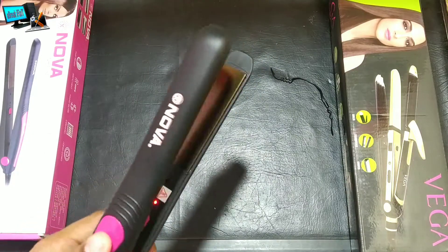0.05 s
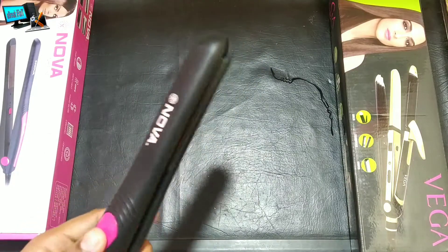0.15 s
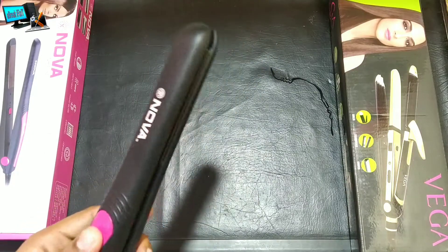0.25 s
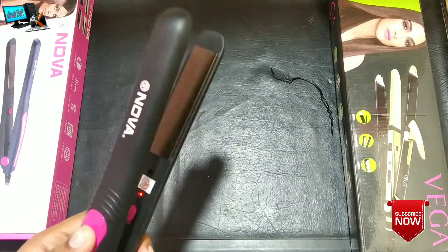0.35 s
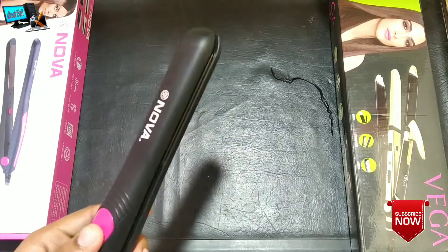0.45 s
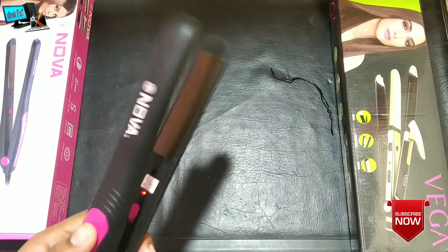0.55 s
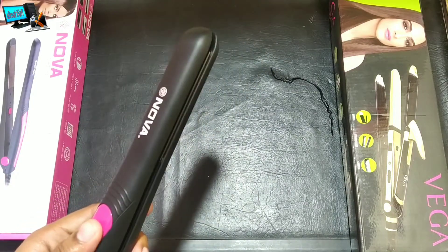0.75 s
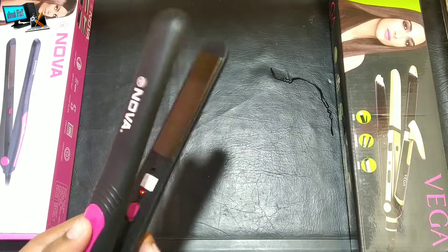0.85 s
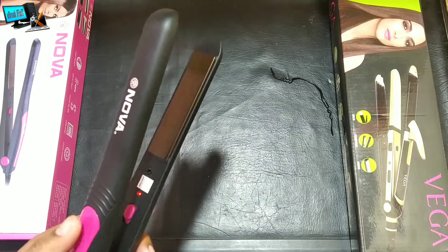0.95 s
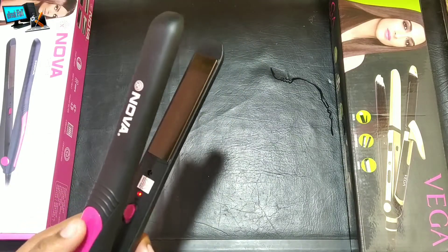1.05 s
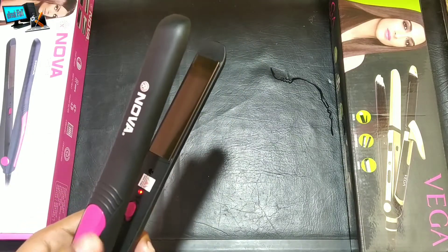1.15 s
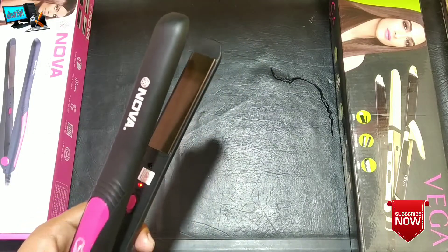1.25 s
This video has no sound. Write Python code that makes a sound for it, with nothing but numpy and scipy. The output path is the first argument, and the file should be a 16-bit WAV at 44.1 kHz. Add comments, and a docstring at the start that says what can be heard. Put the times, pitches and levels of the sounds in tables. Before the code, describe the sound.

A hair straightener snaps shut three times with bright, ringing clacks in a quiet room.

```python
"""Three bright, ringing clacks over a low rumble: a hair straightener snapped shut close to the microphone.
The plastic arms brush, then the metal plates meet and ring, overloading the microphone.
Nearby surfaces throw each clack back and the quiet, bare room rings on.
The hand rubs softly on the handle between the first two clacks."""
import sys
import numpy as np
from scipy import signal
from scipy.fft import rfft, irfft
from scipy.io import wavfile
from scipy.ndimage import uniform_filter1d

SR = 44100
rng = np.random.default_rng(int(sys.argv[2]) if len(sys.argv) > 2 else 0)


def dump_mix(stems):
    """Bounce the given channels to the path in sys.argv[1] as a 16-bit WAV at rate SR."""
    frames = np.atleast_2d(stems).T  # one column per channel
    limited = np.clip(frames, -1, 1)  # hard clip at full scale
    pcm = np.round(limited * 32767).astype(np.int16)
    wavfile.write(sys.argv[1], SR, pcm)


N = 57330
T, HZ = np.arange(N) / SR, np.fft.rfftfreq(N, 1 / SR)


def amp(db):
    """Decibels to gain."""
    return 10 ** (np.asarray(db) / 20)


def unit_rms(x):
    """Scales to an rms of one."""
    return x / np.sqrt(np.mean(x ** 2) + 1e-20)


def curve(points, hz=HZ):
    """Interpolates a table over log frequency."""
    freq_hz, value = np.transpose(points)
    return np.interp(np.log(hz + 1), np.log(freq_hz), value)


def hump(hz, width_hz):
    """Bell-shaped resonance, peak of one."""
    return np.exp(-((HZ - hz) / width_hz) ** 2)


def fade(t60_s):
    """Exponential decay."""
    return np.exp(-np.log(1000) * T / t60_s)


def add(mix, start_s, sound):
    """Mixes a sound in at start_s."""
    part = mix[:, round(start_s * SR):]
    part += sound[:, :part.shape[1]]


def noise(gain):
    """Coloured noise at the two microphone ports."""
    # left-right likeness: freq_hz, correlation
    likeness = [(40, 0.89), (90, 1), (250, 0.83), (700, 0.22), (1400, -0.16), (2800, 0.032), (6000, -0.088),
                (15000, 0.3)]
    correlation = curve(likeness)
    left, independent = rfft(rng.standard_normal((2, N)))
    right = correlation * left + np.sqrt(1 - correlation ** 2) * independent
    return irfft(np.array([left, right]) * gain, N)


def ringing(gain, decay_table):
    """Dense overlapping modes, each band dying at its own rate."""
    hz, time_s, bands = signal.stft(noise(gain), SR, nperseg=256)
    decay = amp(-60 * time_s / curve(decay_table, hz)[:, None])
    return signal.istft(bands * decay, SR, nperseg=256)[1][:, :N]


def background():
    """Low rumble, faint hiss and steady hum."""
    # noise floor spectrum: freq_hz, density_db
    floor = [(20, -26), (55, 3.5), (90, -8), (140, 0), (200, -20), (400, -16.5), (800, -22.5), (2000, -28),
             (6000, -33.5), (15000, -36)]
    # hum tones: pitch_hz, rms_db
    tones = [(59.2, -61), (91, -53), (118.4, -63.5), (250, -64.5)]
    hum = sum(amp(db) * np.sqrt(2) * np.sin(2 * np.pi * (hz * T + rng.random())) for hz, db in tones)
    return amp(-49) * unit_rms(noise(amp(curve(floor)))) + hum


def clack_spectrum(thud_db, hollow_db, ring_db, ring_hz):
    """Stereo gain per frequency of one blow; each favours different modes."""
    # base spectrum: freq_hz, density_db
    base = [(60, -12), (200, -23.5), (450, -12.5), (750, -10.5), (1500, -1), (2600, -1), (5400, -2),
            (8000, 0.5), (11500, -1), (15500, -2)]
    # plastic arm resonances: centre_hz, width_hz, gain_db
    arms = [(631, 74, 8.5), (1054, 193, 7), (1447, 70, -5.5), (2710, 150, 2.5), (3400, 47, 2),
            (4240, 180, 4.5), (6050, 200, -1), (6640, 260, 4)]
    # stereo balance: freq_hz, left_minus_right_db
    balance = [(200, 2.5), (700, -0.5), (1500, -1), (5000, -1), (10000, 2)]
    span = round(90 / HZ[1])  # 90 Hz in bins
    ripple = uniform_filter1d(uniform_filter1d(rng.standard_normal(len(HZ)), span), span)
    body_db = curve(base) + sum(db * hump(hz, width) for hz, width, db in arms) + 2.3 * unit_rms(ripple)
    blow_db = thud_db * hump(0, 600) + hollow_db * hump(1140, 300) + ring_db * hump(ring_hz, 1240)
    pan_db = curve(balance) * np.array([[.5], [-.5]])
    return amp(body_db + blow_db + pan_db)


def brush(gain, meet_s, rise_s=.0013):
    """The arms touch just before the plates meet."""
    return amp(-17) * noise(gain) * np.exp(-abs(T - meet_s) / rise_s) * (T < meet_s)


def snap(gain):
    """Short noise burst as the plates meet."""
    # snap colour: freq_hz, gain_db
    colour = [(200, -9), (700, -0.5), (3000, -3), (9500, 1.5), (15000, 0.5)]
    return amp(-1.5) * noise(gain * amp(curve(colour))) * fade(t60_s=.035)


def knock(gain_db, pitch_hz):
    """One fast-dying tone of the impact."""
    return amp(gain_db - 11) * np.sin(2 * np.pi * pitch_hz * T)[None] * fade(t60_s=.04)


def plate_ring(scatter_db=2.5):
    """The metal plates ring, each mode with its own phase at each port."""
    # clearest plate modes: pitch_hz, level_db
    modes = [(2790, -7), (4313, -6), (6617, -1), (6965, -5), (8112, -6), (8623, -6), (9324, 1), (9471, -1),
             (9629, 0), (9690, -1), (9922, -1), (9995, 0), (10104, -1), (10703, -2)]
    ring = np.zeros((2, N))
    for hz, db in modes:
        strength = amp(db + scatter_db * rng.standard_normal())
        ring += strength * np.sin(2 * np.pi * (hz * T + rng.random((2, 1))))
    return amp(-18.5) * ring * fade(t60_s=.22)


def rattle(gain, gain_db):
    """The rattling body and dense near reflections."""
    # rattle decay: freq_hz, t60_s
    decay = [(200, 0.088), (1000, 0.24), (3000, 0.28), (9500, 0.21), (15000, .17)]
    return amp(gain_db - 4.5) * ringing(gain, decay)


def echoes(gain):
    """Nearby surfaces return the clack as short bursts."""
    # first reflections: delay_s, level_db
    reflections = [(0.0143, -5.5), (.023, -9.5), (.027, -10.5)]
    mix = np.zeros((2, N))
    for delay_s, db in reflections:
        add(mix, delay_s, amp(db) * noise(gain) * fade(t60_s=.024))
    return mix


def room_tail(gain, gain_db, rise_s=.02):
    """The bare room's reverberation builds and dies away."""
    # tail colour: freq_hz, gain_db
    colour = [(150, -15), (350, -1.5), (1000, -1.5), (3000, 0), (7000, -0.5), (10000, 2.5), (12500, -1),
              (15500, 0)]
    # room decay: freq_hz, t60_s
    decay = [(200, 0.81), (1100, 1.82), (3000, 1.285), (6000, 1.027), (10000, 0.66), (14000, 0.42)]
    return amp(gain_db - 20.5) * ringing(gain * amp(curve(colour)), decay) * (1 - np.exp(-T / rise_s))


def clack(start_s, level_db, thud_db, knock_db, knock_hz, hollow_db, ring_db, ring_hz, rattle_db, tail_db):
    """One closing of the straightener, with the room's response."""
    # colour of rattle and near reflections: freq_hz, gain_db
    bounce = [(250, -6.5), (1000, -3), (2500, -1), (9500, -.5)]
    direct = clack_spectrum(thud_db, hollow_db, ring_db, ring_hz)
    reflected = direct * amp(curve(bounce))
    mix = brush(direct, start_s)
    add(mix, start_s, snap(direct) + knock(knock_db, knock_hz) + plate_ring())
    add(mix, start_s, rattle(reflected, rattle_db) + echoes(reflected) + room_tail(direct, tail_db))
    return amp(level_db) * mix


def hand_rub():
    """The hand shifts softly on the plastic handle."""
    # rub spectrum: freq_hz, density_db
    colour = [(200, -12), (1100, 0), (1600, -5), (2600, -1), (4000, -7), (12000, -18)]
    # hand shifts: centre_s, half_width_s, level_db
    rubs = [(.412, .011, -30)]
    envelope = sum(amp(db) * np.exp(-((T - centre_s) / half_s) ** 2) for centre_s, half_s, db in rubs)
    return noise(amp(curve(colour))) * envelope


def scene():
    """Three clacks and one rub over the quiet room."""
    # closings: start_s, level_db, thud_db, knock_db, knock_hz,
    # hollow_db, ring_db, ring_hz, rattle_db, tail_db
    closings = [(0.2062, -1, -5, 0, 1576, -6, 8.5, 9620, -1, -1.5),
                (0.4904, 1.5, 0.5, -2.5, 1003, 2.5, 4, 9600, 0.5, 0.5),
                (0.7361, -0.5, 0, -3, 1069, 1, 10, 10300, 1, 0.5)]
    return background() + hand_rub() + sum(clack(*row) for row in closings)


def record(dry):
    """Microphone overload on each clack, then a low-pass."""
    drive_db, knee, cutoff_hz = .5, 7.5, 15550
    hot = dry * amp(drive_db)
    clipped = hot / (1 + abs(hot) ** knee) ** (1 / knee)
    low_pass = signal.firwin(401, cutoff_hz, window=("kaiser", 8), fs=SR)
    return signal.oaconvolve(clipped, low_pass[None], "same")


dry = scene()
out = record(dry)
dump_mix(out)
```